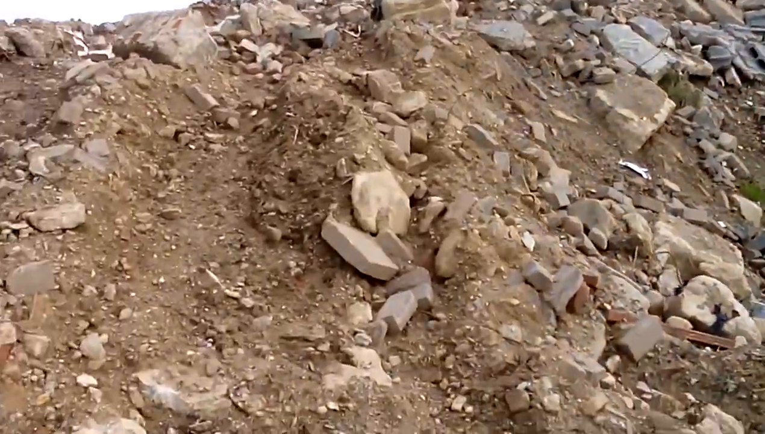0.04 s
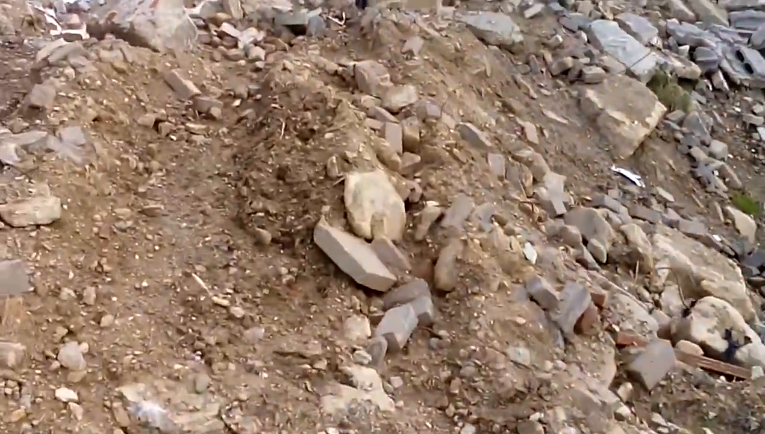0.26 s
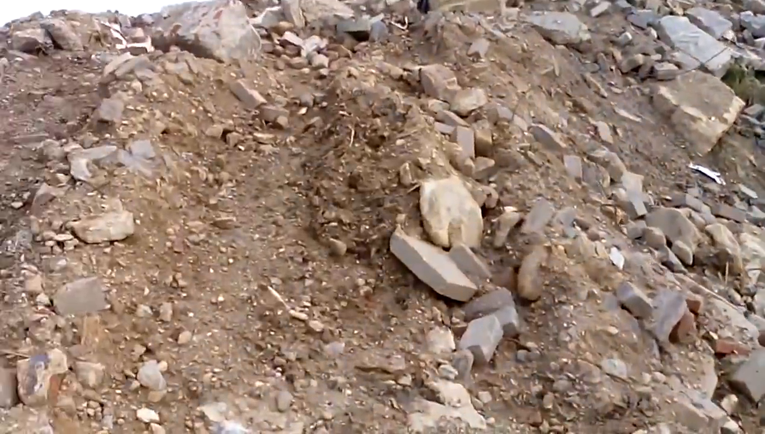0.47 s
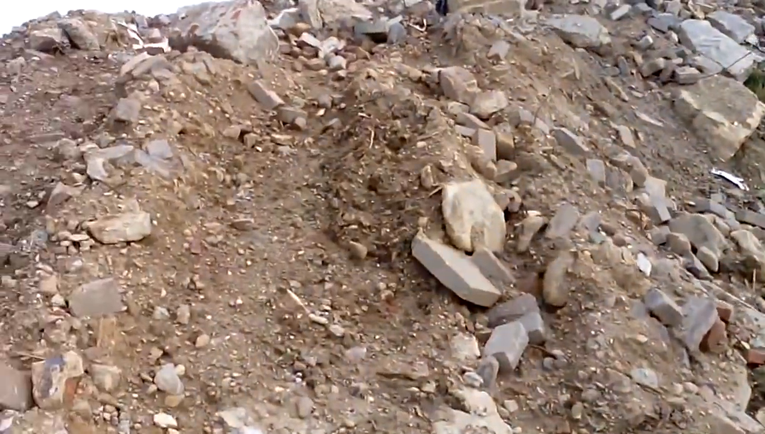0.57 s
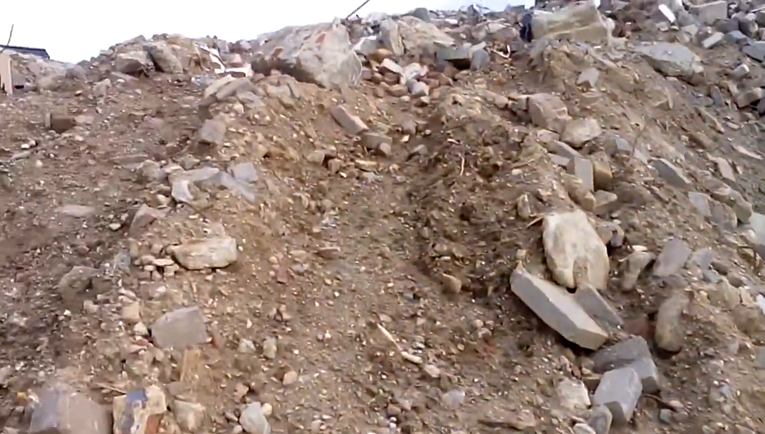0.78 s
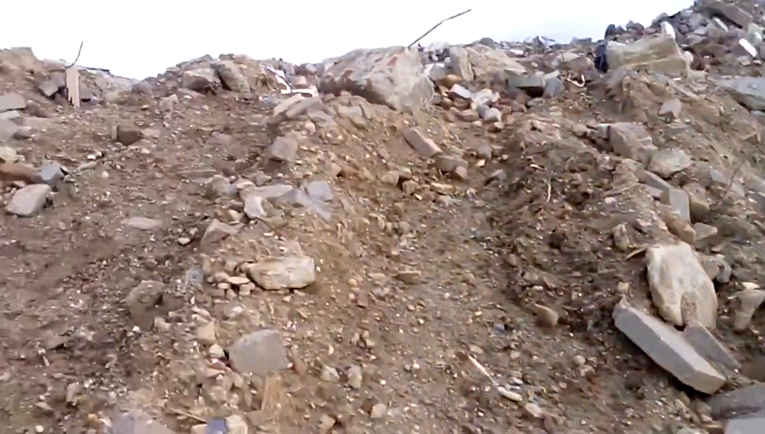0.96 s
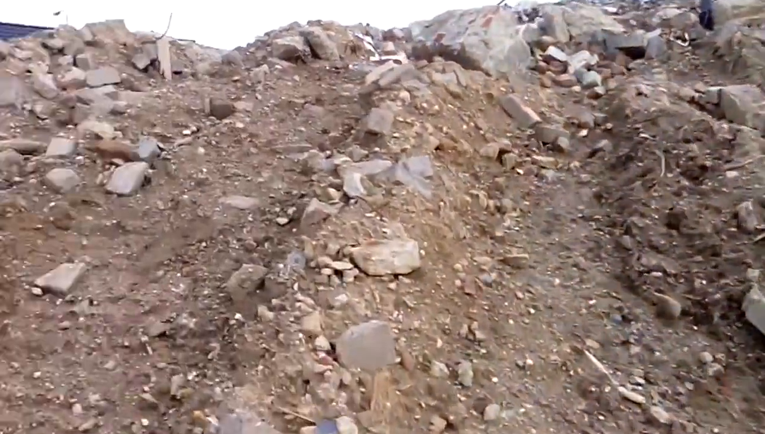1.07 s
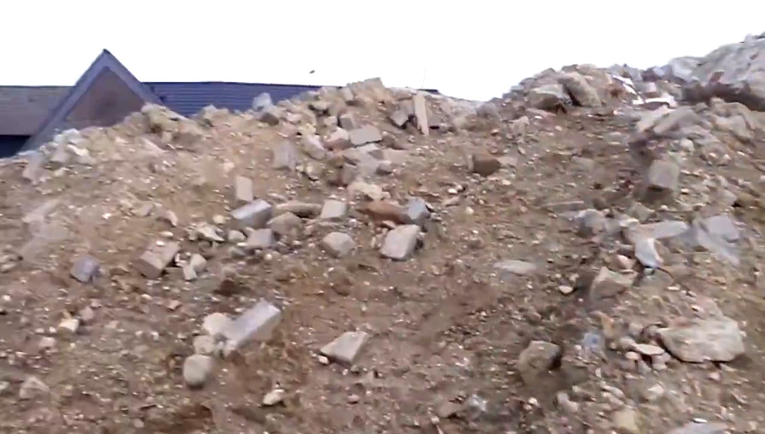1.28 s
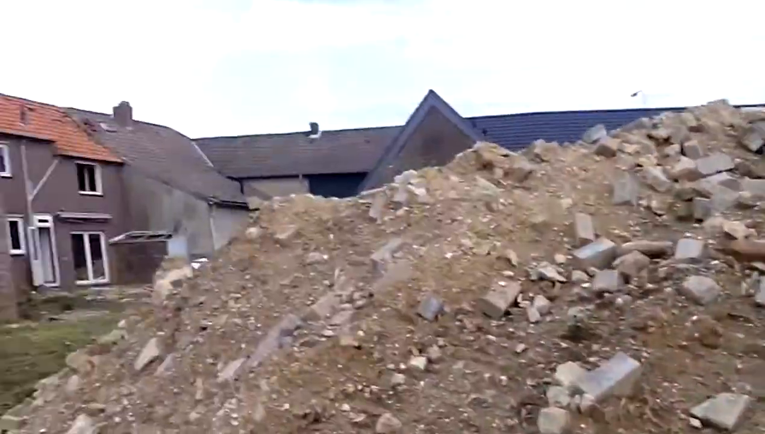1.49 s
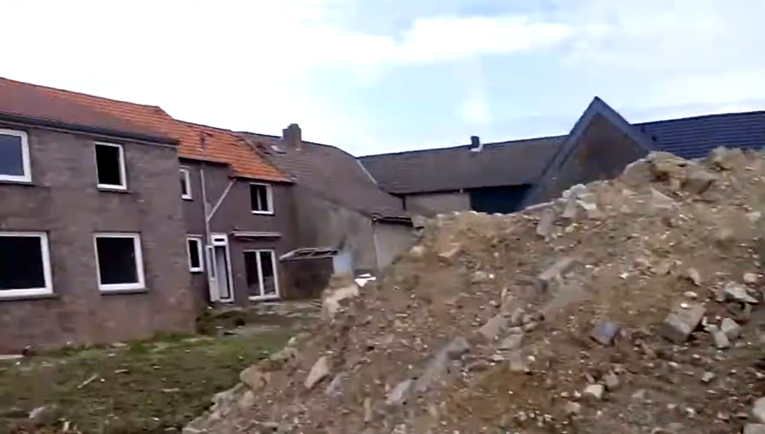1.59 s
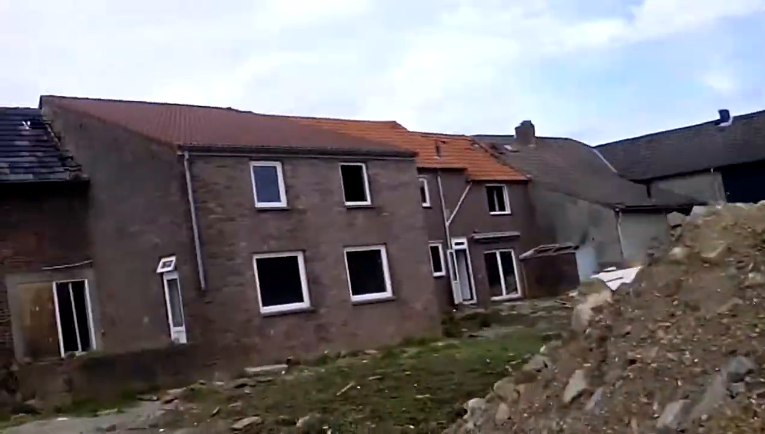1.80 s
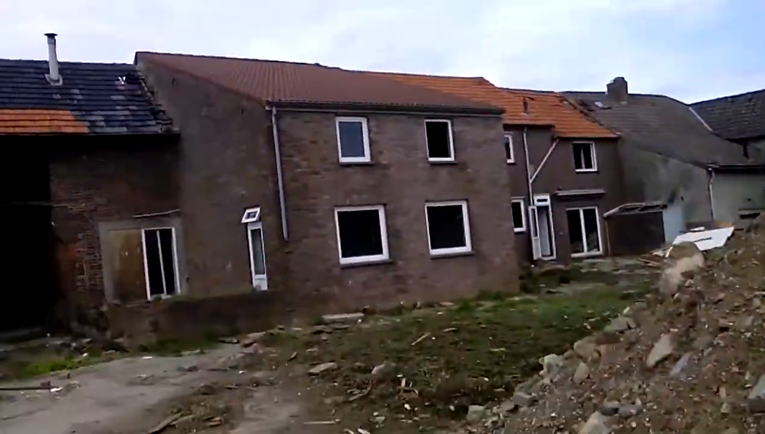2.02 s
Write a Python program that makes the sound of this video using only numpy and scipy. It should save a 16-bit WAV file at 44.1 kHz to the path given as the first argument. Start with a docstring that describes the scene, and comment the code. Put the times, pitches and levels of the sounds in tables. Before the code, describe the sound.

Heavy debris lands on rubble with a hollow, cracking bang, then a step crunches gravel.

```python
"""On a rubble heap outdoors, a heavy piece of debris lands with a hollow, cracking bang.
It hits many times in quick succession and rings; the heap rumbles and grit trickles down.
The hand-held microphone is bumped, then a step crunches into loose gravel and makes bricks clink.
Small stones click here and there, over faint outdoor noise and a little wind."""
import sys
import numpy as np
from scipy import signal
from scipy.fft import rfft, irfft
from scipy.io import wavfile

SR = 44100
rng = np.random.default_rng(int(sys.argv[2]) if len(sys.argv) > 2 else 0)


def unload_wav(signal):
    """Save mono or channel-first audio to the path in sys.argv[1] as 16-bit WAV at rate SR, clipped to [-1, 1]."""
    wavfile.write(
        sys.argv[1],
        SR,
        np.round(np.clip(np.atleast_2d(signal).T, -1, 1) * 32767).astype(np.int16),
    )


N = 90404
T = np.arange(N) / SR

# How a sound swells and fades. Each row: time in seconds, relative level in dB.
WIND_LEVELS = [(0, -57), (.9, -56.5), (1.08, -49), (1.45, -41.5), (1.7, -59), (2.05, -52.5)]  # wind on the microphone
TRICKLE_LEVELS = [(0, -74), (.1, -57), (.19, -69), (.3, -24.5), (.43, -35), (.52, -39.5), (.58, -37.5),
                  (.76, -44.5), (.85, -53.5), (.94, -51.5), (.97, -46.5), (1.08, -57.5), (1.6, -49.5),
                  (1.7, -55), (1.8, -51.5), (2.05, -52)]  # grit running down the heap
RUMBLE_LEVELS = [(.195, -65), (.208, -34), (.285, -24), (.37, -26), (.48, -43), (.62, -50.5), (.8, -59.5),
                 (.95, -85)]  # the heap shaking under the blow
SHUDDER_LEVELS = [(.2, -55), (.3, -49), (.38, -40), (.44, -32.5), (.49, -49.5), (.56, -43), (.65, -77)]  # the ground's deep shudder
SOIL_LEVELS = [(1.08, -58), (1.14, -42), (1.27, -45), (1.32, -28), (1.40, -29.5), (1.5, -33.5),
               (1.62, -43.5), (1.75, -46.5), (1.88, -66)]  # soil packing under the foot
CRUNCH_LEVELS = [(1.1, -59), (1.165, -32), (1.22, -36), (1.28, -29.5), (1.29, -22), (1.365, -21),
                 (1.395, -23), (1.432, -21), (1.48, -29.5), (1.55, -34), (1.63, -45), (1.75, -51.5)]  # gravel crunching
SCUFF_LEVELS = [(1.93, -60), (1.965, -45.5), (1.99, -46), (2.02, -46), (2.05, -42)]  # the next step scuffing fine grit

# A sound's tone: how strong its lows and highs are. Each row: frequency in Hz, relative level in dB.
AIR_TONE = [(30, -10), (69, -16), (205, -27), (337, -13), (511, -16), (794, -10), (1410, -11),
            (2630, -33.5), (5580, -26), (6700, -41), (15000, -73)]
WIND_TONE = [(20, -20), (55, -7), (85, -0.5), (140, -13.5), (400, -19), (1500, -52.5)]
TRICKLE_TONE = [(410, -8.5), (700, -16.5), (965, 0.5), (1400, -7), (1530, -3.5), (1980, 6), (2400, -4),
                (3140, -2.5), (3520, -5.5), (5960, -12), (7700, -31), (10300, -30.5), (15000, -79)]
STONE_TONE = [(300, 4), (2000, 4), (6300, 0), (7600, -12), (11000, -5.5), (15000, -41)]
DEBRIS_TONE = [(59, -40), (100, -41.5), (279, -17), (337, -11), (482, -17), (923, -1), (1210, -14.5),
               (1320, -5.5), (1590, -15.5), (2180, -7), (2630, -14), (3110, -8), (3610, -14.5), (5720, -17),
               (15000, -84)]
CRACK_TONE = [(300, -46), (1500, 12), (3000, 1.5), (6000, 0.5), (9000, -5.5), (15000, -19)]
RUMBLE_TONE = [(25, -10), (60, -15), (110, 1), (180, -3), (280, 2), (500, 0.5), (900, -6), (3000, -37)]
SHUDDER_TONE = [(30, -22), (65, -0.5), (100, -8.5), (135, -6), (250, -14), (800, -57.5)]
RATTLE_TONE = [(150, 3), (520, 3.5), (850, -7), (1100, -5.5), (2300, -10), (3800, -19), (4500, -32),
               (14000, -56)]
SOIL_TONE = [(30, -9), (80, -1), (160, 7.5), (300, 3), (550, 2.5), (850, -2), (1300, -1), (2500, -59)]
CRUNCH_TONE = [(350, -15), (600, -15), (744, -3), (829, -5.5), (1000, -3.5), (1190, -6.5), (1690, -3),
               (1990, -6.5), (3100, -6), (3650, -11), (5920, -15.5), (7350, -26), (15000, -44)]
SCUFF_TONE = [(1200, -17), (2200, 5), (4000, 2.5), (6200, 2.5), (7500, -24), (10800, -12.5), (12500, -37)]

# Single hits. Each row: time in seconds, relative level in dB, pitch in Hz.
STONE_HITS = [(0.075, -50, 4500), (0.099, -45, 3000), (0.55, -31, 3000), (.558, -25, 2300),
              (0.751, -39.5, 2920), (0.889, -41.5, 3780), (0.951, -38.5, 2640), (.975, -42, 2280),
              (1.222, -24, 2120), (1.285, -16, 4350), (1.312, -15.5, 910), (1.331, -13.5, 910),
              (1.337, -20, 5900), (1.358, -23, 2000), (1.364, -17.5, 3300), (1.428, -20.5, 2600),
              (1.542, -28, 2950), (1.687, -40, 1980), (1.724, -44, 2970), (1.735, -31, 1710),
              (1.783, -36.5, 1590), (1.842, -39, 1900), (1.857, -37, 2370), (1.9658, -29, 3400),
              (1.9737, -28, 3060), (1.994, -35, 3800), (2.0026, -25.5, 3640)]  # small stones landing
BRICK_HITS = [(0.382, -29.5, 3135), (1.296, -21, 2170), (1.356, -16, 2913), (1.425, -19.5, 3235),
              (1.441, -22, 3157)]  # bricks knocking together
SOFT_THUMPS = [(0.746, -37.5, 79.5), (1.117, -21, 140), (1.13, -23, 58), (1.129, -31, 260),
               (1.157, -22, 183), (1.17, -23, 68.6), (1.189, -29, 76), (1.268, -19, 81.5),
               (1.333, -24.5, 71.4), (1.399, -19.5, 308), (1.737, -31, 300), (1.832, -43.5, 65.4)]  # bumps on the microphone and the ground
# Blows of the falling piece. Each row: start in seconds, relative level in dB,
# frequency in Hz above which the blow is muffled, pitch in Hz of the spot struck.
DEBRIS_BLOWS = [(.196, -32.5, 3500, 1570), (.202, -21.5, 3520, 703), (.206, -12, 1800, 676),
                (.214, -17.5, 2600, 1565), (.222, -3, 8750, 1756), (.241, -3, 3140, 1301),
                (.245, -3.5, 1400, 950), (.261, -5, 2900, 2186), (.268, -3.5, 1710, 961),
                (.281, -9, 1310, 855), (.294, -7, 2590, 1765), (.311, -10.5, 1240, 942),
                (.323, -18, 4640, 3866), (.348, -16, 2360, 621), (.376, -20, 1390, 815),
                (.418, -24.5, 2500, 915), (.431, -24, 4040, 2156), (.488, -24, 1500, 902),
                (.576, -27.5, 2140, 1750)]

# The notes the piece rings with. Each row: pitch in Hz, relative level in dB.
DEBRIS_NOTES = [(568, -7.5), (717, -13), (853, -6.5), (899, 2.5), (947, 0.5), (976, -7), (1044, -2),
                (1284, -17.5), (1503, -2.5), (1788, 2), (2142, -3.5), (2300, -20), (3043, -6.5)]
# The notes of loose bricks. Each row: pitch in Hz, width in Hz before narrowing, relative level in dB.
BRICK_NOTES = [(751, 57, -1.5), (1740, 140, 1), (2290, 62, 3), (3004, 45, 2.5), (3193, 40, -15.5),
               (3960, 45, -10), (4840, 42, -9), (5730, 170, -4)]
# The notes of two knocks. Each row: pitch in Hz, relative level in dB, seconds to fade by 60 dB.
CORNER_NOTES = [(222, -5.5, 0.1), (654, 2, 0.055)]  # the piece's first corner landing
HOUSING_NOTES = [(300, 6, 0.028), (490, 3, 0.015), (1070, -5, 0.0073)]  # the microphone's housing


def undb(db):
    """Turn decibels into a number to multiply by."""
    return 10 ** (np.asarray(db) / 20)


def unit(x):
    """Scale a signal so that its average power is 1."""
    return x / np.sqrt(np.mean(x ** 2))


def fade(start, t60):
    """Start suddenly, then die away by 60 dB every t60 seconds."""
    return (T >= start) * np.exp(-np.log(1000) * np.maximum(T - start, 0) / t60)


def curve(rows):
    """Glide from level to level, with silence from just outside the first and last rows."""
    times, db = np.array(rows).T
    return undb(np.interp(T, times, db)) * (T > times[0] - .04) * (T < times[-1] + .04)


def colour(x, tone):
    """Filter a sound to give it a tone; white noise would keep its power."""
    hz, db = np.array(tone).T
    size = 4096
    log_hz = np.log(np.maximum(np.arange(size // 2 + 1) * SR / size, 1))
    db = np.interp(log_hz, np.log(hz), db) - 9 * np.maximum(np.log(hz[0]) - log_hz, 0)
    # Build the filter so that it rings only after a hit, never before.
    cepstrum = irfft(db * np.log(10) / 20)
    cepstrum[1:size // 2] *= 2
    cepstrum[size // 2 + 1:] = 0
    response = irfft(np.exp(rfft(cepstrum)))
    return signal.fftconvolve(x, response / np.linalg.norm(response))[:N]


def lowpass(x, hz):
    """Gently muffle everything above hz."""
    return signal.sosfilt(signal.butter(2, hz, fs=SR, output="sos"), x)


def noise():
    """An even hiss: white noise."""
    return rng.standard_normal(N)


def grains(rate, spread_db):
    """Tiny random contacts, about rate per second; spread_db makes their strengths uneven."""
    strength = undb(spread_db * np.minimum(rng.exponential(size=N), 4))
    return unit((rng.random(N) < rate / SR) * strength * rng.choice([-1, 1], N))


def ring(start, notes, rise):
    """Fading pure notes, set going by a push that builds over rise seconds."""
    push = np.clip((T - start) / rise, 0, 1)
    return push * sum(undb(db) * fade(start, t60) * np.sin(2 * np.pi * hz * (T - start))
                      for hz, db, t60 in notes)


def resonate(x, hz, width):
    """Make a sound ring around one pitch; a smaller width in Hz rings longer."""
    return signal.lfilter(*signal.iirpeak(hz, hz / width, fs=SR), x) * np.sqrt(SR / (np.pi * width))


def outdoors():
    """Steady distant noise, and wind fluttering on the microphone."""
    flutter = undb(2 * unit(lowpass(noise(), hz=8.2)))
    air = undb(-55.5) * colour(noise(), AIR_TONE)
    return air + curve(WIND_LEVELS) * flutter * colour(noise(), WIND_TONE)


def trickle():
    """Grit runs down the heap and ticks on the bricks."""
    flow = curve(TRICKLE_LEVELS)
    grit = colour((grains(rate=1300, spread_db=-1) + .5 * noise()) * flow, TRICKLE_TONE)
    ticks = bricks(grains(rate=230, spread_db=5) * flow)
    return undb(-2.5) * grit + undb(-7) * ticks


def bricks(contacts):
    """Loose bricks ring a little at every contact."""
    ringing = sum(undb(db) * resonate(contacts, hz, 0.55 * width) for hz, width, db in BRICK_NOTES)
    ringing /= np.linalg.norm([undb(db) for _, _, db in BRICK_NOTES])
    return lowpass(lowpass(ringing, hz=6360), hz=6360)


def stones():
    """Small stones strike, ring for an instant and chatter."""
    out = 0
    for start, db, hz in STONE_HITS:
        contacts = grains(rate=3300, spread_db=0.5) * fade(start, t60=0.058)
        contacts[int(start * SR)] += 6.3  # the first strike stands out
        chatter = undb(-10.5) * resonate(contacts, hz, width=.65 * hz)
        clack = ring(start, [(hz, -6, 0.014)], rise=0.00089)
        out += undb(db) * (chatter + clack)
    return colour(out, STONE_TONE)


def crash():
    """Each blow clatters, rings the piece and throws chips; the main one cracks it."""
    out = 0
    for start, db, muffle_hz, spot_hz in DEBRIS_BLOWS:
        burst = noise() * fade(start, t60=0.12)
        clatter = colour(burst / np.linalg.norm(burst), DEBRIS_TONE)
        ringing = 0
        for hz, note_db in DEBRIS_NOTES:
            pitch = hz * (1 + 0.0041 * rng.standard_normal())  # each blow is slightly out of tune
            ringing += undb(note_db) * np.sin(2 * np.pi * (pitch * (T - start) + rng.random()))
        ringing *= fade(start, t60=0.22)
        spot = ring(start, [(spot_hz, -1, 0.055)], rise=0.0032)
        chips = undb(-21.5) * grains(rate=3100, spread_db=4.5) * fade(start, t60=0.099)
        body = undb(21) * clatter + undb(12) * ringing / np.linalg.norm(ringing) + spot
        out += undb(db) * (lowpass(body, muffle_hz) + colour(chips, CRACK_TONE))
    crack = undb(-8.5) * colour(noise() * fade(start=.222, t60=0.13), CRACK_TONE)
    corner_knock = undb(-17.5) * ring(start=.2055, notes=CORNER_NOTES, rise=0.0032)
    return out + crack + corner_knock


def rumble():
    """The heap shakes under the blow and the ground shudders."""
    heap = colour(grains(rate=3300, spread_db=1) * curve(RUMBLE_LEVELS), RUMBLE_TONE)
    ground = colour(noise() * curve(SHUDDER_LEVELS), SHUDDER_TONE)
    return heap + ground


def clinks():
    """Bricks knock together and ring briefly, each at its own pitch."""
    return sum(ring(start, [(hz, db, 0.069)], rise=0.0016) for start, db, hz in BRICK_HITS)


def bumps():
    """Dull thumps of a wave or two, and one hollow, rattling knock on the microphone's housing."""
    thumps = 0
    for middle, db, hz in SOFT_THUMPS:
        cycles = (T - middle) * hz
        thumps -= undb(db) * np.cos(2 * np.pi * cycles) * np.exp(-(cycles / 0.65) ** 2)
    knock_s = 1.1242
    knock = undb(-13.5) * ring(knock_s, HOUSING_NOTES, rise=0.00096)
    rattle = undb(-15.5) * colour(noise() * fade(knock_s, t60=0.049), RATTLE_TONE)
    return thumps - knock + rattle


def step():
    """A foot grinds gravel, jostles bricks and packs the soil; then the next step starts to scuff."""
    level = curve(CRUNCH_LEVELS)
    gravel = colour((grains(rate=1100, spread_db=1.5) + 0.52 * noise()) * level, CRUNCH_TONE)
    dull = signal.sosfiltfilt(signal.butter(3, 5200, fs=SR, output="sos"), gravel)
    brightness = (level / level.max()) ** 0.4  # the crunch sounds duller as it gets quieter
    crunch = undb(-5) * (dull + brightness * (gravel - dull))
    ticks = undb(-10) * bricks(grains(rate=320, spread_db=2) * level)
    soil = colour(grains(rate=1500, spread_db=-0.5) * curve(SOIL_LEVELS), SOIL_TONE)
    scuff = colour(grains(rate=3500, spread_db=6.5) * curve(SCUFF_LEVELS), SCUFF_TONE)
    return crunch + ticks + soil + scuff


def with_echoes(x):
    """Add dull, scattered echoes from the heaps and house walls."""
    tail = lowpass(noise() * fade(start=0.009, t60=0.56), hz=2560)
    return x + undb(-17.5) * signal.fftconvolve(x, tail / np.linalg.norm(tail))[:N]


def scene():
    """Mix all the sounds into one channel; only the crash, stones and clinks echo."""
    hits = with_echoes(crash() + stones() + clinks())
    return (hits + rumble() + trickle() + step() + bumps() + outdoors())[None]


def record(dry):
    """The recorder overloads on the bang and cuts the highs above 16000 Hz."""
    clipped = np.clip(dry, -.95, .95)
    return signal.sosfilt(signal.ellip(8, .2, 70, 16000, fs=SR, output="sos"), clipped)


dry = scene()
out = record(dry)
unload_wav(out)
```